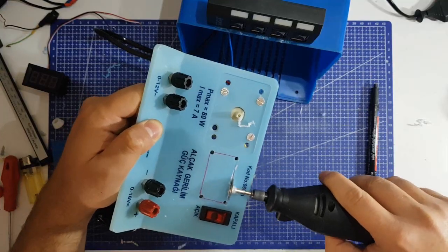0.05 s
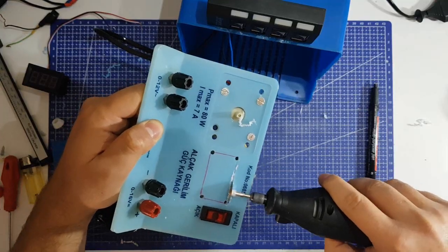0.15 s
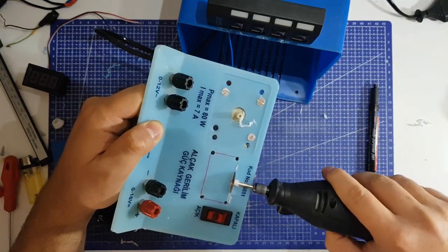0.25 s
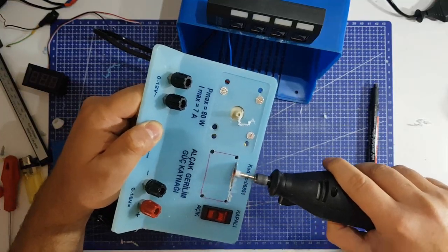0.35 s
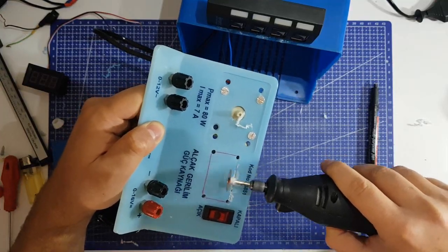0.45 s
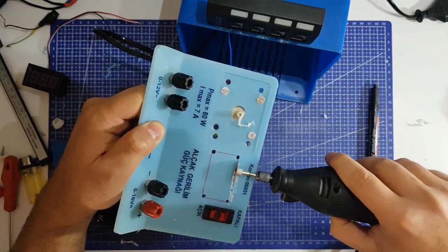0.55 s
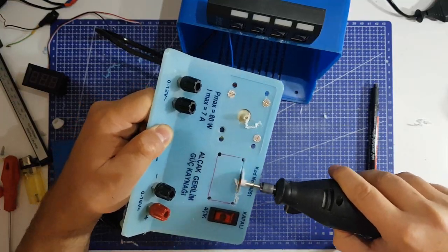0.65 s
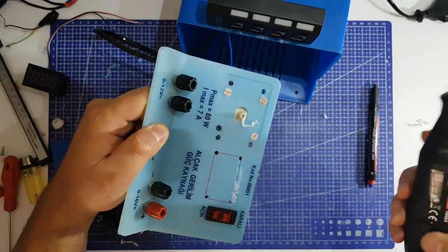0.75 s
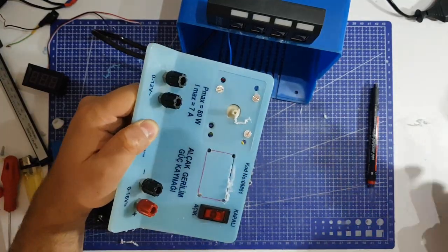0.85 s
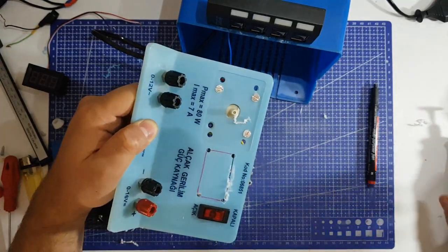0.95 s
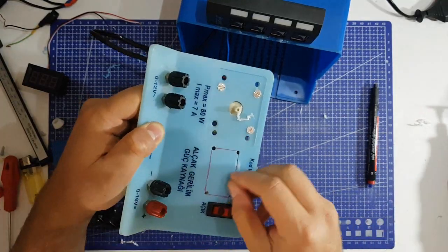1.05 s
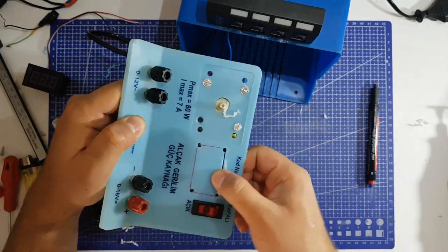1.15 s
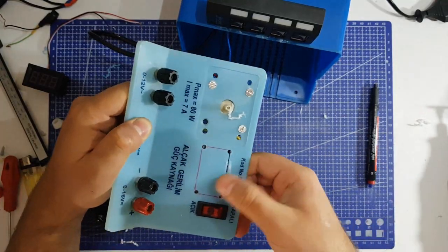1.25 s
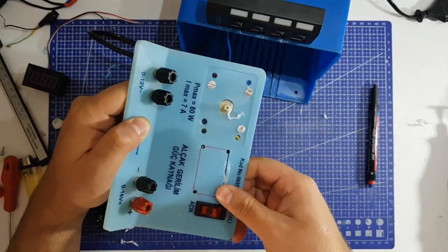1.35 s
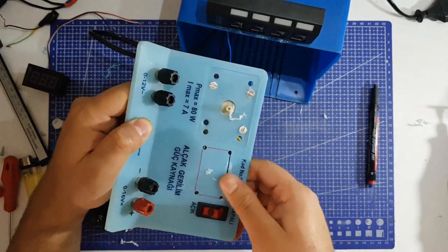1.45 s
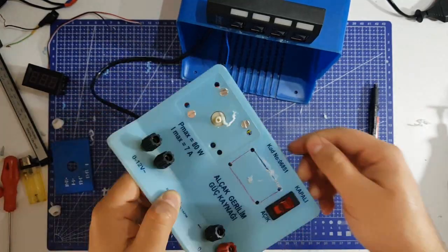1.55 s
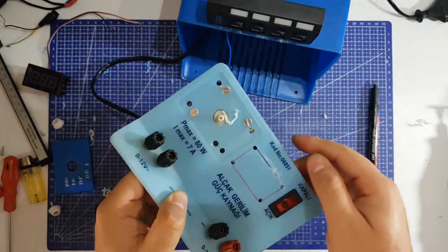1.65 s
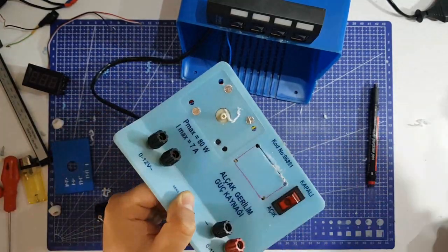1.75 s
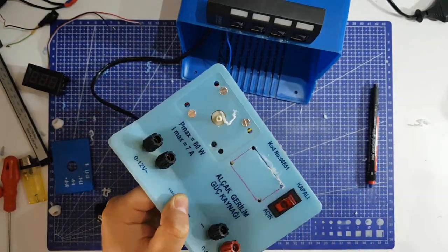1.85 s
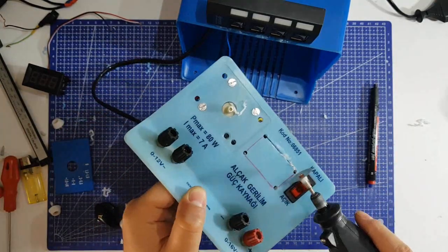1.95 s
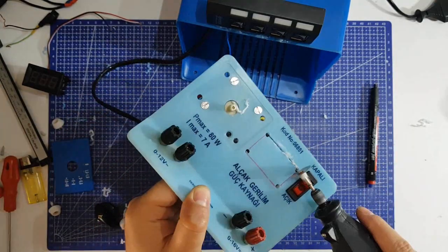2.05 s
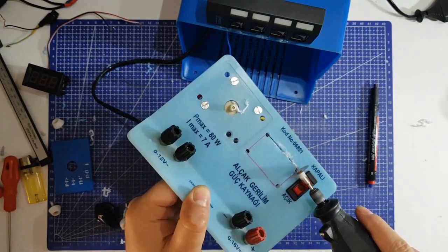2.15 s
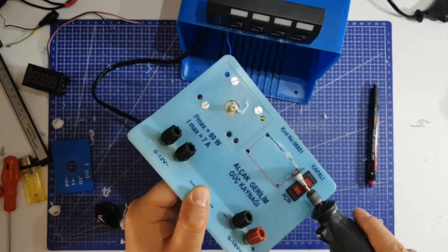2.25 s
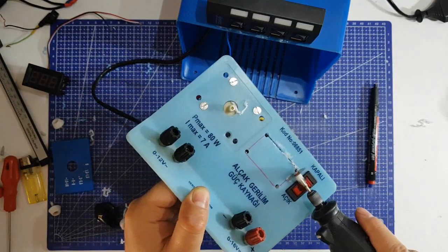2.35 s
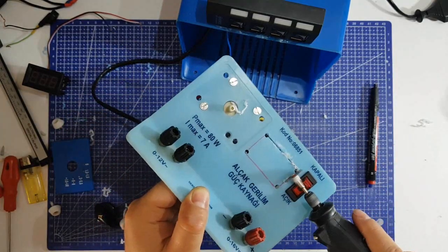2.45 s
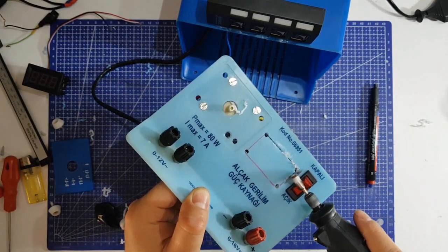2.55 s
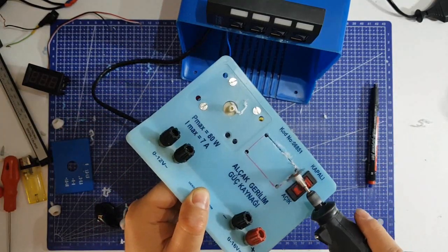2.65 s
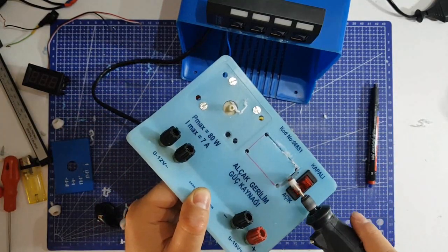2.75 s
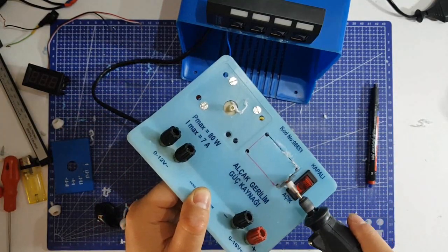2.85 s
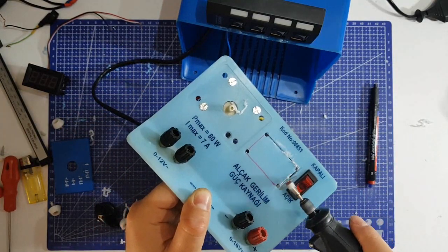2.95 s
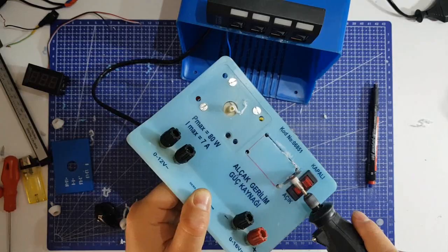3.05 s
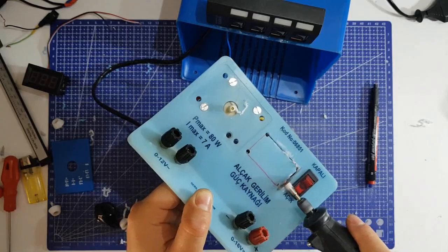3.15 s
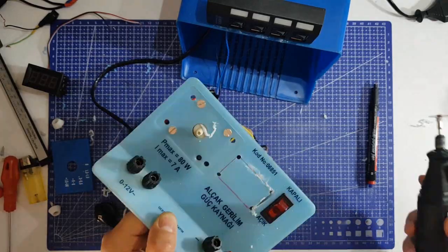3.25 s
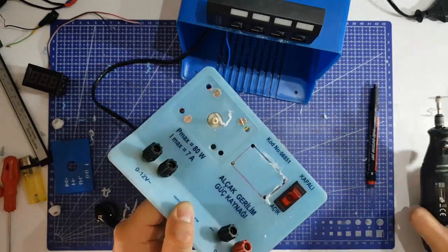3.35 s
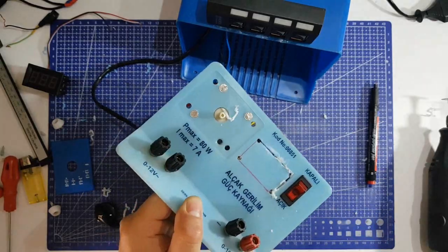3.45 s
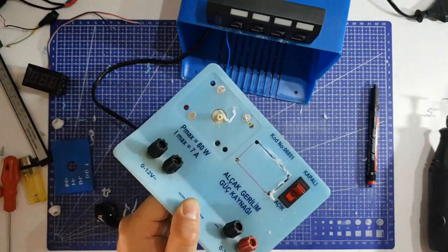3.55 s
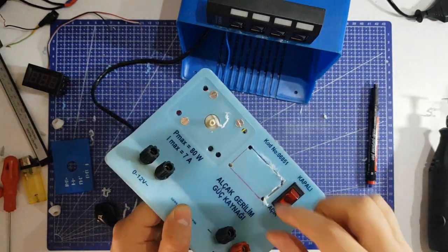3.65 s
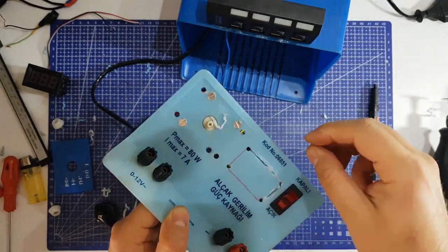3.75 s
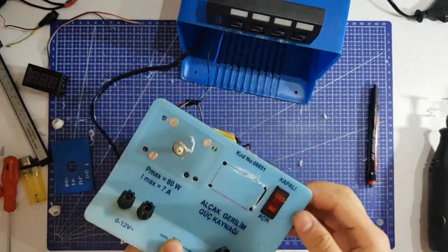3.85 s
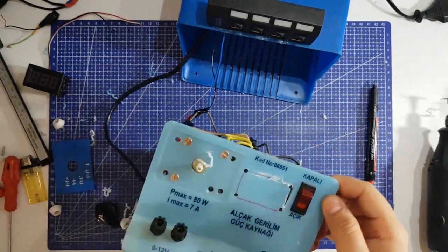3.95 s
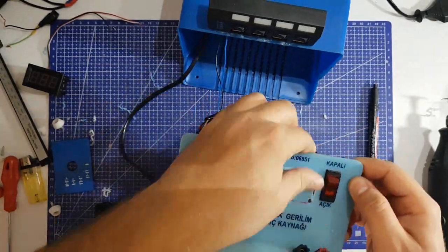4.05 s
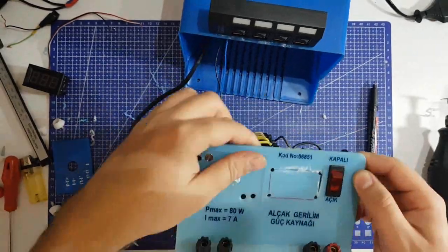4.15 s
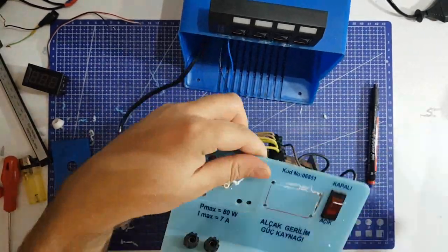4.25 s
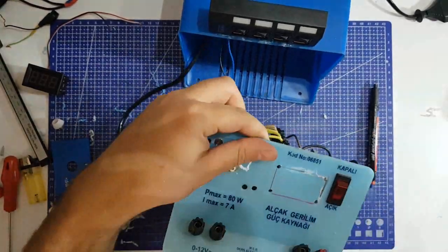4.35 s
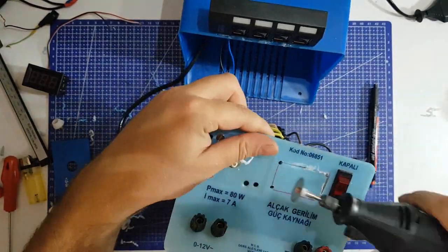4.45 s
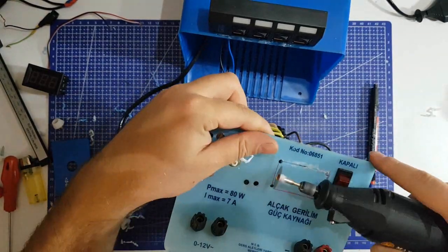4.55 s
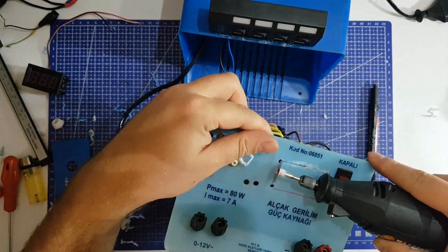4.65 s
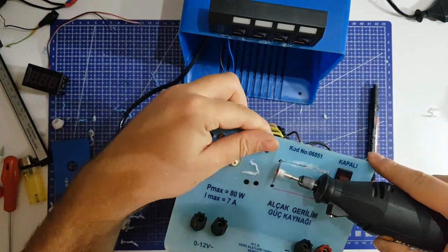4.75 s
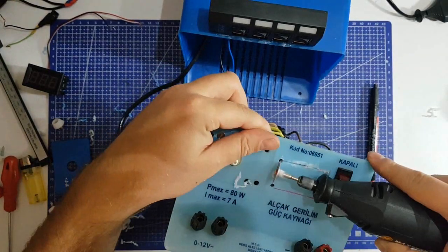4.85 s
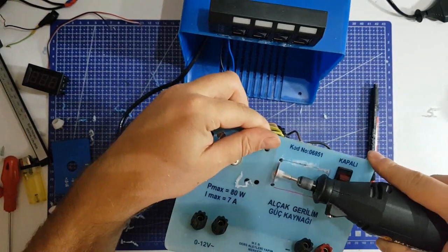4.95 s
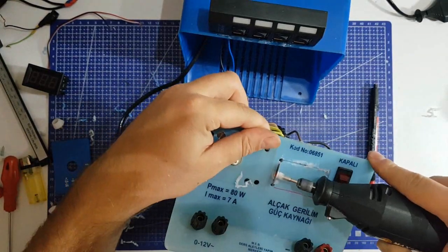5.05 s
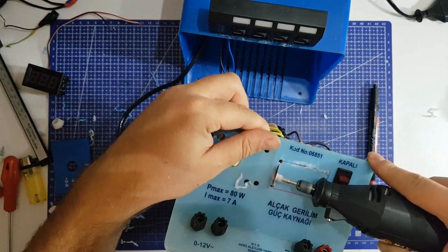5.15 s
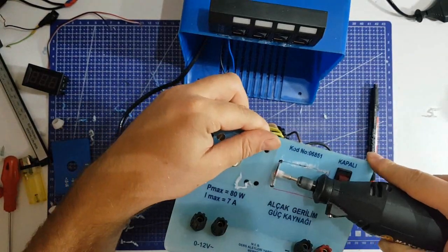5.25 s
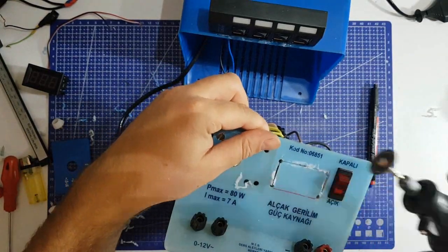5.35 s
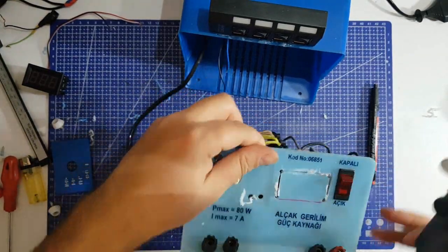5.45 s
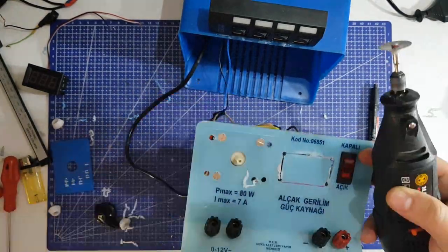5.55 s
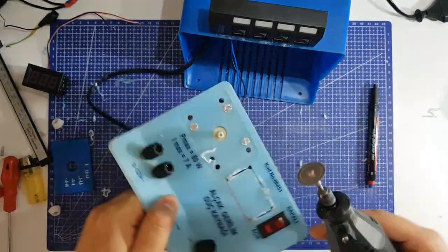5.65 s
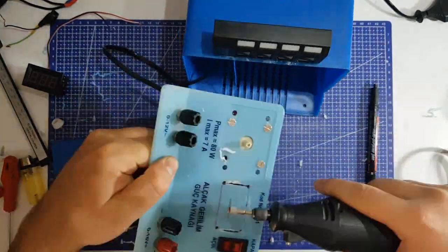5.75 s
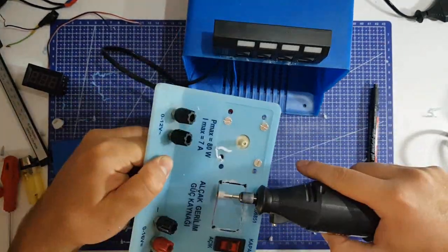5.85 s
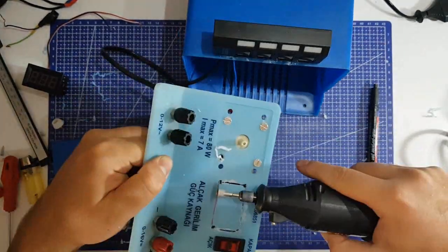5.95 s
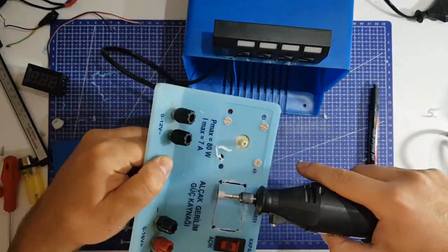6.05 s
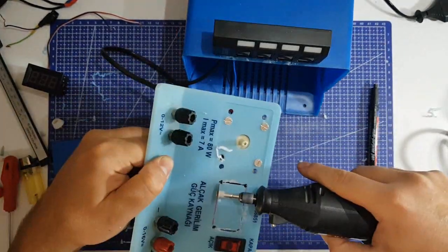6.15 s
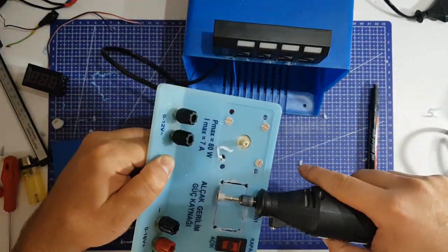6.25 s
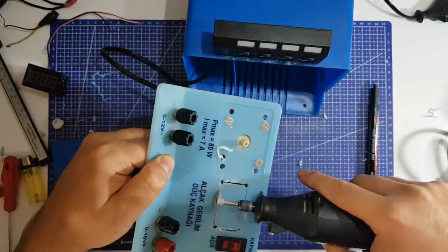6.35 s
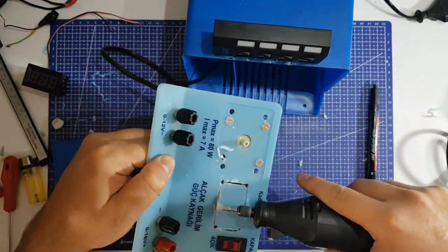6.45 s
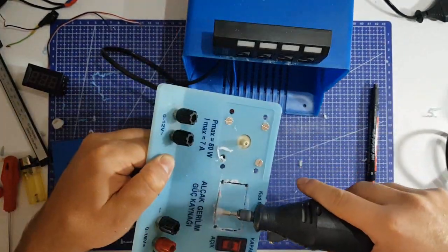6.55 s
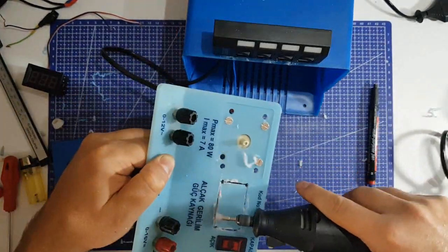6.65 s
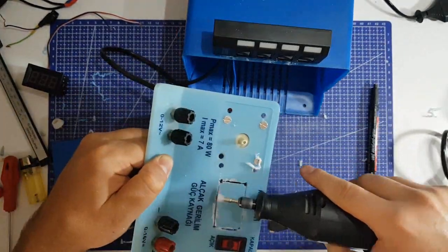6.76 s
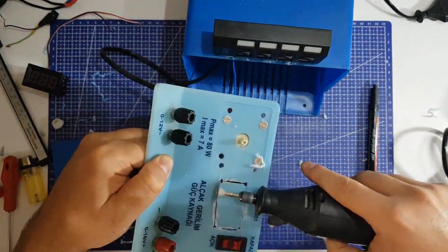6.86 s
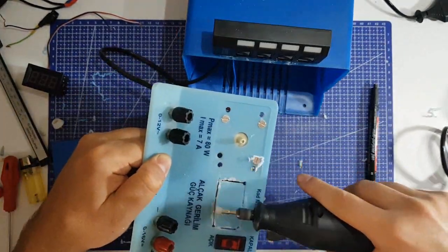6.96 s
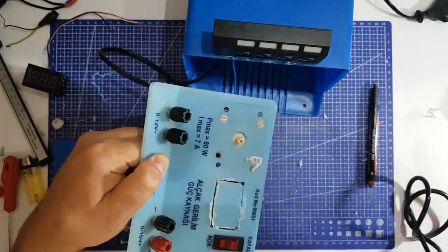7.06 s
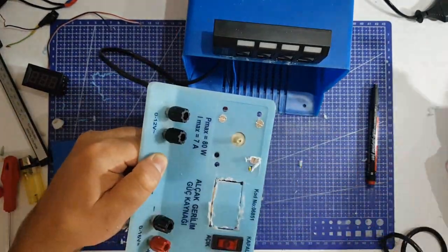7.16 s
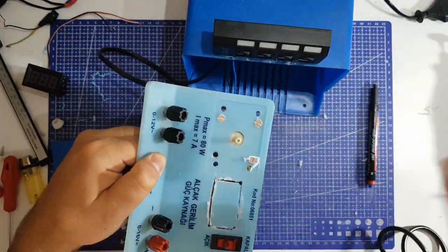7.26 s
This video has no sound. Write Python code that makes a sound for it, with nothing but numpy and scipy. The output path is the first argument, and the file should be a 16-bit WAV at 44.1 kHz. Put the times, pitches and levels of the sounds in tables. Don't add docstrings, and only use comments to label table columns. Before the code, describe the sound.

Close up in a small soft workshop, a sped-up rotary tool cuts plastic with a shrill whine that sags under load and springs back. It stops while fingers tap and scratch at the burrs, returns in short nervous bites, pauses again, then runs longer and higher at greater power before spinning down. Small ticks mark jumps in time. The microphone is near and the room nearly dry.

```python
import sys
import numpy as np
from scipy import signal
from scipy.fft import rfft, irfft, next_fast_len
from scipy.io import wavfile
from scipy.ndimage import uniform_filter1d, map_coordinates

SR = 44100
rng = np.random.default_rng(int(sys.argv[2]) if len(sys.argv) > 2 else 0)


def generate_wav(sig):
    pcm = np.round(np.clip(np.atleast_2d(sig).T, -1, 1) * 32767).astype(np.int16)
    wavfile.write(sys.argv[1], SR, pcm)


def rack_gain(trim_db):
    fader = np.asarray(trim_db, float)
    return 10 ** (fader / 20)


N = 321930
TOP_HZ = 15880


def unit(x):
    return x / np.sqrt(np.mean(x ** 2) + 1e-20)


def along(points, hz):
    f, v = np.transpose(points)
    return np.interp(np.log(hz + 1), np.log(f + 1), v)


def by_speed(law, shaft_hz):
    hz, *cols = np.transpose(law)
    return np.array([rack_gain(along(np.c_[hz, c], shaft_hz)) for c in cols])


def curves(rows):
    s, *cols = np.transpose(rows)
    return np.array([np.interp(np.arange(N) / SR, s, c) for c in cols])


def glide(s, v):
    t, gap = np.arange(N) / SR, np.diff(s)
    rise = np.diff(v)
    slope = rise / gap
    a, b = slope[:-1], slope[1:]
    wa, wb = 2 * gap[1:] + gap[:-1], gap[1:] + 2 * gap[:-1]
    inner = np.where(a * b > 0, (wa + wb) * a * b / (wa * b + wb * a + 1e-9), 0)
    tangent = np.r_[slope[0], inner, slope[-1]]
    k = np.clip(np.searchsorted(s, t) - 1, 0, len(gap) - 1)
    x = np.clip((t - s[k]) / gap[k], 0, 1)
    bend = gap[k] * x * (1 - x) * (tangent[k] * (1 - x) - tangent[k + 1] * x)
    return v[k] + rise[k] * x * x * (3 - 2 * x) + bend


def spans(rows, swell_s):
    level = np.zeros(N)
    for start, end, db in rows:
        level[round(start * SR):round(end * SR)] = rack_gain(db)
    return np.abs(uniform_filter1d(level, size=round(swell_s * SR)))


def wobble(rate):
    knots = rng.standard_normal(int(N * rate / SR) + 4)
    return map_coordinates(knots, [np.arange(N) * rate / SR], order=1)


def filtered(x, response):
    m = next_fast_len(N + SR // 10, real=True)
    return irfft(rfft(x, m) * response(np.fft.rfftfreq(m, 1 / SR)), m)[..., :N]


def noise(spectrum):
    return unit(filtered(rng.standard_normal(N), lambda hz: rack_gain(along(spectrum, hz))))


def resonance(f, centre, width, db):
    return rack_gain(db) * 1j * f * width / (centre * centre - f * f + 1j * f * width)


# frequency in Hz, level in dB per Hz.
QUIET = [(100, -42.5), (450, -19.5), (800, -16), (1200, -3.5), (1600, -20.5), (3000, -19), (4000, -34),
         (5000, -27), (6000, -33), (15800, -40.5)]


def quiet_workshop():
    return rack_gain(-71 + 3.5 * wobble(25)) * noise(QUIET)


# frequency in Hz, decay time t60 in seconds.
WALLS = [(500, 0.059), (1500, 0.09), (6000, 0.037), (15000, 0.084)]


def room(x):
    hz, t, z = signal.stft(rng.standard_normal(SR // 4), SR, nperseg=128)
    decay = rack_gain(-60 * t / along(WALLS, hz)[:, None])
    tail = signal.istft(z * decay, SR, nperseg=128)[1]
    delayed = np.pad(x, (60, 0))
    return signal.fftconvolve(delayed, tail / np.linalg.norm(tail))[:N]


HARD_SKIPS = [.056, .715, 2.35, 2.69, 4.96, 5.186, 5.752, 5.824, 6.094, 6.459, 6.527, 6.662]
SOFT_SKIPS = [2.484, 2.917, 2.985, 4.756, 4.824, 5.255, 5.528, 5.596, 5.686, 5.889, 5.957, 6.028, 6.323,
              6.39, 6.595, 6.753, 7.025]


def skip_ticks():
    ticks = np.zeros(N)
    for skips, db in ((HARD_SKIPS, -57.5), (SOFT_SKIPS, -64.5)):
        for s in skips:
            ticks[round(s * SR)] = rack_gain(db + 37.5) * rng.choice([-1, 1])
    return ticks


# time in seconds, peak level in dB.
POPS = [(2.157, -32.5), (2.162, -38), (2.177, -32.5), (2.1917, -25.5), (2.197, -29.5), (2.217, -27.5),
        (2.226, -34), (2.24, -23.5), (2.25, -28.5), (2.271, -26.5), (2.283, -29.5), (2.17, -39),
        (2.184, -37.5), (2.231, -33.5), (2.252, -35), (2.288, -36.5), (2.31, -35.5), (2.318, -35.5),
        (2.328, -37.5), (2.345, -33.5), (2.356, -40), (5.458, -25)]


def cable_pops():
    blows = np.zeros(N)
    for s, db in POPS:
        blows[round(s * SR)] = rack_gain(db + 26.5) * rng.choice([-1, 1])
    return filtered(blows, lambda f: (1j * f / (380 + 1j * f)) ** 4 * (2000 / (2000 + 1j * f)) ** 4)


# frequency in Hz, width in Hz, level in dB.
PANEL = [(775, 71, -7.5), (1087, 115, 4.5), (1293, 60, 7.5), (1620, 38, -3), (2024, 59, -9.5),
         (2650, 400, -17.5), (5200, 450, -18.5)]


def panel(force, modes):
    def response(f):
        ring = sum((-1) ** k * resonance(f, *mode) for k, mode in enumerate(modes))
        return ring * (1j * f / (650 + 1j * f)) ** 2
    return filtered(force, response)


# time in seconds, peak level in dB, crack in dB above the knock.
KNOCKS = [(1.031, -26, -3), (1.595, -29, -17), (1.841, -42, -17), (3.354, -37, -9), (3.507, -29.5, -2.5),
          (3.522, -24.5, -2), (3.543, -27, -5), (4.188, -35, -8.5), (4.241, -43, -18), (4.349, -27, -6),
          (5.455, -32, -6), (5.837, -27, -19.5), (7.187, -39, -11), (7.266, -41.5, -11)]
# time in seconds, peak level in dB, scratch in dB above the tap.
TAPS = [(1.263, -49, -25), (3.437, -47, -30), (3.468, -50, -30), (0.964, -45, -5), (0.989, -39.5, -12.5),
        (1.122, -34.5, -14), (1.148, -50, 6), (1.279, -41.5, -10.5), (1.329, -34.5, -26), (1.34, -41, -6.5),
        (1.392, -40, -24), (1.414, -32, -8.5), (1.503, -43.5, -1.5), (1.57, -37.5, -21),
        (1.741, -41.5, 0.5), (1.085, -49, -18), (1.164, -39.5, -14), (1.252, -46, -27), (1.477, -41.5, -7),
        (1.575, -44, -24), (1.73, -42, -14), (1.768, -46, -10), (1.896, -49, -14), (3.831, -36.5, -22.5),
        (3.942, -44.5, -5), (3.981, -38, -18.5), (3.985, -31.5, -26), (4.016, -34, -32), (4.023, -44, -24),
        (4.068, -41, -30), (4.076, -35, -35), (4.103, -36.5, -25), (4.11, -40.5, -25), (4.124, -45, -23),
        (4.163, -46.5, -15), (4.329, -44, -14), (4.34, -49.5, -12), (4.401, -48.5, -7), (4.437, -58.5, 3),
        (5.43, -33, -18), (5.525, -35, -22), (5.566, -35.5, -20), (5.623, -31.5, -25), (5.718, -43, -18),
        (5.753, -30, -21), (5.765, -27, -20), (5.8, -42, -16), (7.295, -39.5, -30)]


def strikes():
    sheet, rim, scrape = np.zeros((3, N + SR))
    t = np.arange(SR // 8) / SR
    nail_lag_s = .003
    hits = [(s, db, -30, scratch_db, nail_lag_s) for s, db, scratch_db in TAPS]
    hits += [(s, db, crack_db, -18.5, 0) for s, db, crack_db in KNOCKS]
    for s, db, crack_db, scratch_db, lag_s in hits:
        rattle = .42 * rack_gain(-60 * t / 0.04) * rng.standard_normal(len(t))
        push = rattle + 30 * t / .0004 * rack_gain(-60 * t / 0.0012)
        crack = rack_gain(-60 * t / 0.021) * rng.standard_normal(len(t))
        sheet[round(s * SR):][:len(t)] += rack_gain(db - 3.0) * push
        rim[round(s * SR):][:len(t)] += rack_gain(db + crack_db + 15.5) * crack
        scrape[round((s + lag_s) * SR):][:len(t)] += rack_gain(db + scratch_db - 8.0) * rack_gain(-60 * t / 0.028)
    return sheet[:N], rim[:N], scrape[:N]


# start in seconds, rms level in dB, scratch in dB above the panel,
# length in seconds.
RUBS = [(0.81, -60, -30, 0.14), (2.002, -58.5, -30, 0.033), (1.032, -56, -5, 0.041),
        (1.147, -61.5, -5, 0.053), (1.246, -67, -22, 0.017), (1.371, -67, -4, 0.029),
        (1.475, -59, -12, 0.018), (1.589, -55, 9, 0.076), (1.705, -67, -10, 0.062),
        (1.897, -67, 6.5, 0.018), (2.14, -59, -23, 0.29), (3.935, -57.5, 9, 0.026),
        (3.964, -51, -17, 0.051), (4.071, -50.5, -34, 0.013), (4.094, -54, -24, 0.041),
        (4.154, -53.5, -10, 0.03), (4.359, -49, 8.5, 0.02), (5.51, -52, -20, 0.041),
        (5.542, -56, -22, 0.073), (5.688, -48, 6.5, 0.077), (5.734, -49, 9.5, 0.064),
        (5.787, -49.5, 10, 0.044)]


def rubs():
    sheet, flex, scrape = np.zeros((3, N + SR))
    grains = rng.standard_normal(N + SR) * np.pad(rack_gain(6.8 * wobble(200)), (0, SR))
    for s, db, scratch_db, length in RUBS:
        at = slice(round(s * SR), round((s + length) * SR))
        stroke = np.sqrt(np.hanning(at.stop - at.start))
        sheet[at] += rack_gain(db + 16.0) * stroke * grains[at]
        flex[at] += rack_gain(db - 19.5) * stroke
        scrape[at] += rack_gain(db + scratch_db - 7.5) * stroke
    return sheet[:N], flex[:N], scrape[:N]


# frequency in Hz, width in Hz, level in dB.
EDGE = [(2230, 340, 5), (2500, 1210, 0), (3065, 295, 2), (4650, 140, -13.5)]
# frequency in Hz, level in dB per Hz.
SCRATCH = [(300, -28.5), (2000, -11.5), (5500, -2.5), (9000, -8), (15800, -9.5)]
# frequency in Hz, level in dB per Hz.
FLEX = [(180, -23.5), (300, -7.5), (600, 2), (1000, -31.5)]
# start in seconds, end in seconds, level in dB.
CREAKS = [(1.2, 1.5, -83)]


def fingers():
    hit_sheet, rim, hit_scrape = strikes()
    rub_sheet, flex, rub_scrape = rubs()
    ringing = panel(hit_sheet + rub_sheet, PANEL) + panel(rim, EDGE)
    scratching = (hit_scrape + rub_scrape) * noise(SCRATCH) * rack_gain(4.2 * wobble(300))
    creaks = spans(CREAKS, .05) * rack_gain(4 * wobble(40))
    return ringing + scratching + (flex + creaks) * noise(FLEX)


# time in seconds, shaft speed in Hz, bite of the wheel in dB.
FIRST = [
    [(0.0, 3133, -33.5), (0.04, 2900, -35), (0.05, 2630, -26), (0.078, 2016, -32.5), (0.114, 2538, -31.5),
     (0.163, 1663, -30), (0.177, 2000, -34)],
    [(0.204, 2518, -36.5), (0.258, 2356, -31.5), (0.299, 2090, -33), (0.367, 2800, -28), (0.4, 2500, -33),
     (0.449, 1499, -31.5)],
    [(0.463, 1200, -30), (0.481, 837, -34), (0.491, 660, -30), (0.505, 561, -34), (0.527, 520.4, -37.5),
     (0.557, 745, -57.5), (0.585, 2650, -63)],
    [(0.603, 3020, -58.5), (0.607, 3070, -33.5), (0.617, 3190, -45)],
    [(0.632, 3256, -44.5), (0.65, 2910, -30.5), (0.66, 2597, -26), (0.716, 2347, -33.5), (0.74, 2076, -35),
     (0.77, 1928, -33), (0.793, 1738, -31), (0.808, 1128, -41.5)],
    [(0.82, 2320, -88), (0.884, 3454, -51), (0.895, 3250, -66), (0.925, 2563, -80), (0.96, 1960, -90)],
]
# time in seconds, shaft speed in Hz, bite in dB.
SECOND = [
    [(1.981, 2120, -78), (2.019, 3050, -86), (2.075, 3576, -73), (2.187, 3840, -53), (2.192, 3845, -41),
     (2.215, 3826, -38.5)],
    [(2.238, 3700, -42.5), (2.295, 3050, -32), (2.347, 2552, -26), (2.361, 2376, -30), (2.375, 1836, -36.5),
     (2.392, 1168, -29), (2.412, 720, -40.5), (2.442, 2525, -70)],
    [(2.482, 3153, -62), (2.486, 3183, -33.5), (2.51, 3270, -34.5), (2.56, 2902, -31.5),
     (2.575, 2400, -37.5), (2.596, 1735, -32), (2.612, 1294, -37.5), (2.628, 2430, -84)],
    [(2.664, 3180, -49.5), (2.678, 3210, -49.5), (2.682, 3240, -32.5), (2.734, 3233, -35.5),
     (2.742, 3020, -34), (2.764, 2270, -39.5), (2.778, 2130, -49)],
    [(2.782, 2206, -35.5), (2.795, 2500, -31), (2.82, 2880, -52), (2.846, 3300, -67)],
]
# time in seconds, shaft speed in Hz, bite in dB.
SECOND_END = [
    [(2.889, 3540, -41), (2.927, 3120, -33.5), (2.94, 2560, -40), (2.953, 2300, -35), (2.966, 2560, -33),
     (2.984, 2535, -33)],
    [(2.996, 2079, -37), (3.012, 1620, -36.5), (3.023, 1347, -30.5), (3.032, 1758, -42.5),
     (3.043, 2257, -39), (3.049, 2440, -58), (3.06, 2680, -67)],
    [(3.075, 2987, -64), (3.079, 3085, -37), (3.117, 3204, -37.5), (3.15, 3080, -34), (3.161, 2620, -33),
     (3.176, 1950, -36), (3.19, 1523, -31.5), (3.201, 1763, -36)],
    [(3.222, 2320, -32), (3.228, 2267, -40), (3.235, 1952, -32), (3.247, 1700, -36.5), (3.259, 1377, -32),
     (3.268, 1410, -39), (3.282, 1866, -34.5), (3.292, 1727, -44.5), (3.304, 2406, -69)],
    [(3.32, 2820, -81), (3.37, 3500, -72), (3.411, 3710, -67), (3.42, 3490, -65), (3.48, 2290, -72),
     (3.6, 775, -91)],
]
# time in seconds, shaft speed in Hz, bite in dB.
THIRD = [
    [(4.53, 2489, -79), (4.552, 3560, -62), (4.582, 4250, -50.5), (4.64, 4746, -50), (4.788, 5041, -50),
     (4.836, 4860, -34.5), (4.934, 3930, -30), (5.006, 3434, -36.5), (5.036, 3494, -31)],
    [(5.116, 3107, -34), (5.158, 3150, -28.5), (5.248, 3994, -35), (5.304, 4600, -37.5),
     (5.42, 4860, -36.5), (5.5, 5058, -96), (5.6, 5151, -63), (5.98, 5147, -68)],
    [(6.03, 5065, -32.5), (6.138, 4387, -36.5), (6.2, 4292, -49.5), (6.226, 4214, -33.5),
     (6.3, 3670, -38.5), (6.356, 3738, -38.5), (6.456, 3524, -41), (6.602, 3375, -32.5)],
    [(6.663, 2689, -34.5), (6.74, 3480, -36), (6.765, 3738, -35.5), (6.772, 3790, -70), (6.782, 3450, -35),
     (6.81, 3286, -31.5), (6.856, 4160, -74)],
    [(6.922, 4835, -35), (6.982, 4518, -32.5), (7.002, 4130, -43), (7.062, 3300, -33), (7.086, 3930, -65),
     (7.138, 4556, -41.5), (7.15, 4250, -58), (7.25, 2075, -95), (7.299, 1380, -110)],
]
# time in seconds, imbalance in dB, overtone tilt in dB per order.
SEAT = [
    [(0, -3.5, -8), (.05, 3.5, -4.5), (.11, 0, 0.2), (.16, 3, -2.5), (.22, -0.5, 2), (.3, -0.5, -4.5),
     (.37, -6.5, -0.5), (.44, -9.5, -0.5), (.47, 2, 0.5), (.52, -2, 1), (.63, 2.5, -1), (.67, -12, -0.8),
     (.73, 5, -1.8), (.8, -7.5, -2)],
    [(2.2, -3.5, 2), (2.24, 4, -2), (2.3, 0, -3.5), (2.38, 2.3, -2.5), (2.51, -4, 0.5), (2.6, 2.5, -1),
     (2.7, -10, 3.5), (2.77, 3, -4.5), (2.81, -8, -2.5), (2.9, 1.5, 3), (2.97, 3.5, -3.5), (3.02, 3, -0.5),
     (3.12, -2, -4.5), (3.19, 3.5, -0.2), (3.22, -3, -4), (3.26, 3, -0.5), (3.3, -6, -5)],
    [(4.8, 11, -20), (4.88, -4.5, -2.5), (4.96, -3.5, -4), (5.04, -6.5, 3.5), (5.13, -4.5, 0.1),
     (5.22, -13, -2), (5.34, -1.5, -3), (5.42, 6.5, 3.5), (6.05, 1.5, 6), (6.15, 0.5, 11), (6.25, 4.5, 2.7),
     (6.35, 8, -3.5), (6.5, 5.5, 1.5), (6.62, 2.5, 0.4), (6.76, 3.5, 1.3), (6.82, -2, -1.5), (6.95, 0.3, 7),
     (7.05, 0, -7.5)],
]
# shaft speed in Hz, whine in dB, overtones in dB, fan in dB.
FREE = [(800, -115, -85, -65.5), (2130, -75, -89, -53), (3300, -56.5, -58, -47), (4600, -46.5, -65, -43.5),
        (4860, -37.5, -64, -42), (5224, -32, -57, -41)]
# shaft speed in Hz, whine in dB, overtones in dB, grit in dB,
# panel rumble in dB.
LOADED = [(566.2, -22, -7, -5.5, 3.5), (847, -2, -7.5, -5.5, -2.5), (1400, 3.5, -3, -6, -1.5),
          (1700, -9.5, 1, -8, -14.5), (2120, -12, -1, -11, -15.5), (2650, -20.5, 3, -16, -25),
          (3380, -13.5, -2.5, -17, -36), (3480, -6, 3, -21.5, -32), (4690, 1, 1, -28, -39)]
# start in seconds, end in seconds, grit in dB, panel rumble in dB.
JAMS = [(0.06, 0.079, -40.5, -44), (0.142, 0.173, -36, -39), (0.273, 0.334, -33, -33.5),
        (0.484, 0.553, -40, -42.5), (0.726, 0.805, -36.5, -34.5), (2.979, 3.048, -49, -59.5),
        (3.174, 3.206, -45.5, -41.5), (3.236, 3.291, -45.5, -40), (6.994, 7.071, -36, -48.5)]


def motor_state():
    rows = []
    for run in (FIRST, SECOND + SECOND_END, THIRD):
        run = [(*row, 0) for row in sum(run, [])]
        (start_s, start_hz, *_), (end_s, end_hz, *_) = run[0], run[-1]
        rows += [(start_s - .046, .5 * start_hz, -110, -40), (start_s - .034, .6 * start_hz, -110, -9)]
        rows += [*run, (end_s + .044, .5 * end_hz, -110, -40)]
    shaft_hz = glide(*np.transpose(rows)[:2])
    _, bite_db, running_db = curves(rows)
    imbalance_db, tilt_db = curves(sum(SEAT, []))
    free = rack_gain(running_db) * by_speed(FREE, shaft_hz)
    free[:2] *= rack_gain(2 * running_db)
    cut = rack_gain(bite_db) * by_speed(LOADED, shaft_hz)
    jam_grit, jam_rumble = [spans([(a, b, dbs[k]) for a, b, *dbs in JAMS], 0.0086) for k in (0, 1)]
    return dict(shaft_hz=shaft_hz, whine=np.hypot(free[0], cut[0] * rack_gain(imbalance_db)), hum=free[1],
                overtone=cut[1], fan=free[2], grind=np.hypot(cut[2], jam_grit),
                shake=np.hypot(cut[3], jam_rumble), jam=jam_grit, tilt_db=tilt_db)


def shaft_turns(shaft_hz, slow):
    skips = HARD_SKIPS + SOFT_SKIPS
    jumps = np.zeros(N)
    jumps[[round(s * SR) for s in skips]] = rng.uniform(-.2, .2, len(skips))
    jumps = uniform_filter1d(uniform_filter1d(jumps, size=16), size=16)
    return np.cumsum(shaft_hz * (1 + .0026 * slow * wobble(400)) / SR + jumps)


# start in seconds, end in seconds, level in dB.
BUZZ = [(0, .56, -52), (.69, .8, -55), (2.27, 2.43, -61), (2.49, 2.6, -55), (2.69, 2.82, -55.5),
        (2.9, 3.05, -52), (3.09, 3.29, -54), (4.7, 4.84, -70), (4.84, 4.92, -60.5), (4.92, 5.1, -54),
        (5.1, 5.31, -51), (5.31, 5.44, -56), (6.13, 6.18, -55.5), (6.18, 6.33, -50), (6.33, 6.58, -57),
        (6.58, 6.7, -51.5), (6.7, 6.83, -53.5)]


def mains_ripple():
    ripple_hz = 996
    phase = 2 * np.pi * ripple_hz * np.arange(N) / SR + 0.49 * wobble(30)
    return phase, rack_gain(2.6 * wobble(40)) * np.sin(phase), spans(BUZZ, .05)


# frequency in Hz, level in dB.
RADIATE = [(1000, 22), (1600, -12), (3000, -4), (4200, -2), (5100, 11.5), (6500, -1), (8500, -4.5),
           (10500, -6), (13500, 0.5), (16000, -1.5)]


def orders(order, turns, shaft_hz, db, flutter_db):
    hz = order * shaft_hz[::8]
    flutter = uniform_filter1d(uniform_filter1d(rng.standard_normal(hz.shape), size=40), size=40)
    share = rack_gain(along(RADIATE, hz) + db + flutter_db * unit(flutter)) * (hz < TOP_HZ + 500)
    share = share / np.sqrt(np.sum(share ** 2, axis=0) + 1e-9)
    share = np.repeat(share.astype(np.float32), 8, axis=1)[:, :N]
    start = np.float32(2 * np.pi * rng.random(order.shape))
    waves = np.sin(np.float32(2 * np.pi * order) * np.float32(turns % 2) + start)
    return np.sum(share * waves, axis=0)


# start in seconds, end in seconds, level in dB.
BOUNCE = [(2.236, 2.284, -33), (2.328, 2.36, -45.5), (2.497, 2.545, -34), (2.683, 2.733, -47.5),
          (2.803, 2.82, -40), (2.908, 2.931, -39), (2.953, 2.963, -41.5), (2.989, 3.001, -44),
          (3.11, 3.149, -41.5), (6.993, 7.017, -42)]
BOUNCE_DB = [10, 3, -11, -15.5, -13.5]


def bounce(turns, shaft_hz):
    half = np.arange(.5, 5)[:, None]
    return spans(BOUNCE, 0.012) * orders(half, turns, shaft_hz, np.c_[BOUNCE_DB], flutter_db=3)


def torque_throb(carrier, turns, shaft_hz, phase, ripple, buzz):
    pulses = ripple + .5 * rack_gain(3 * wobble(30)) * np.sin(2 * phase)
    throb = filtered(rack_gain(34) * buzz * pulses * carrier, lambda hz: 1 / (1 + (5000 / (hz + 1)) ** 8))
    slow_enough = np.clip((4500 - shaft_hz) / 500, 0, 1)
    throb += rack_gain(-6) * buzz * rack_gain(4 * wobble(25)) * slow_enough * np.sin(2 * np.pi * turns + phase)
    throb[:round(4.5 * SR)] *= .1
    side_db = np.where(np.arange(N) < 5.8 * SR, -1, 3)
    return throb * rack_gain(side_db + 3 * wobble(35))


def bearing_cage(turns, shaft_hz, buzz):
    khz = shaft_hz / 1000
    window = np.clip(khz - 2, 0, 1) * np.clip(4.5 - khz, 0, 1)
    return buzz * rack_gain(-7 + 3 * wobble(30)) * window * np.sin(2 * np.pi * .37 * turns)


# frequency in Hz, level in dB per Hz.
FAN = [(300, -42.5), (1200, -27), (2300, -27.5), (4000, -17.5), (5200, -10), (7500, -15), (9500, -8.5),
       (12000, -4), (15800, -9.5)]
# frequency in Hz, level in dB per Hz.
CUT = [(300, -23.5), (1200, 1.5), (2000, -31.5), (3300, -11), (5500, 5.5), (8800, -4.5), (13800, 1),
       (15800, 2.5)]


def fan_and_grit(turns, fan, grind):
    grit = noise(CUT) * (1 + .5 * np.sin(2 * np.pi * turns)) * rack_gain(4.5 * wobble(700))
    return fan * noise(FAN) + grind * unit(grit)


def panel_rumble(turns, slow, shake):
    bite = unit(np.exp(6 * np.cos(2 * np.pi * turns))) * np.clip(slow / 8, 0, 1)
    force = (rng.standard_normal(N) + 0.47 * bite) * rack_gain(6.2 * wobble(150))
    return shake * unit(panel(force, PANEL))


# frequency in Hz, width in Hz, level in dB.
SING = [(804, 73, 5), (1150, 36, -6.5), (1289, 78, 5), (1600, 40, 7.5), (5120, 430, -7)]
# frequency in Hz, width in Hz, level in dB.
HOUSING = [(6390, 280, -4.5), (8030, 290, -2), (9560, 690, 2), (10300, 350, 4), (11700, 410, 0.5),
           (13390, 690, 2.5), (14160, 200, -0.5), (14800, 250, 7)]


def sing(x):
    return filtered(x, lambda f: 1 + sum(resonance(f, *mode) for mode in SING + HOUSING))


def tool():
    state = motor_state()
    shaft_hz = state["shaft_hz"]
    slow = np.clip(2600 / shaft_hz, 0, 3) ** 2 + 1.3 * np.clip(rack_gain(40.5) * state["jam"], 0, 4)
    turns = shaft_turns(shaft_hz, slow)
    phase, ripple, buzz = mains_ripple()

    chatter_db = 4.5 * np.clip(slow - .6, 0, 1.5)
    order = np.arange(2, 12)[:, None]
    tilt_db = (order - 2) * state["tilt_db"][::8]
    overtones = state["overtone"] * orders(order, turns, shaft_hz, tilt_db, flutter_db=3 + chatter_db[::8])
    whine = state["whine"] * rack_gain((1.36 + .5 * chatter_db) * wobble(70)) * np.sin(2 * np.pi * turns)
    hum = state["hum"] * (np.sin(2 * np.pi * 2 * turns) + .7 * np.sin(2 * np.pi * 3 * turns))
    throb = torque_throb(overtones, turns, shaft_hz, phase, ripple, buzz)
    tones = whine + rack_gain(-4) * overtones + hum + throb + bounce(turns, shaft_hz)

    cage = bearing_cage(turns, shaft_hz, buzz)
    hiss = fan_and_grit(turns, state["fan"], state["grind"])
    rumble = panel_rumble(turns, slow, state["shake"])
    return np.sqrt(2) * (sing(tones) + cage) + hiss + rumble, np.sqrt(2) * buzz * ripple


def scene():
    motor, buzz = tool()
    near = motor + fingers() + cable_pops()
    return np.tile(near + rack_gain(-7.0) * room(near) + buzz + quiet_workshop(), (2, 1))


def roll_off(x):
    return signal.sosfilt(signal.butter(12, 17090, fs=SR, output="sos"), x)


def record(dry):
    def edge(hz):
        return np.sin(np.pi / 2 * np.clip((TOP_HZ - hz) / 150, 0, 1)) ** 2
    return roll_off(filtered(dry + skip_ticks(), edge))


dry = scene()
out = record(dry)
generate_wav(out)
```